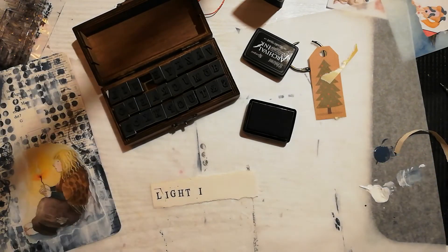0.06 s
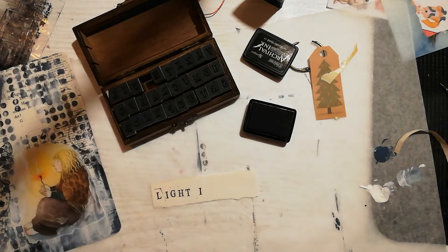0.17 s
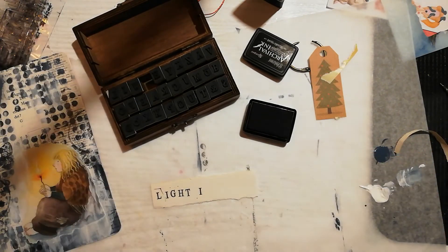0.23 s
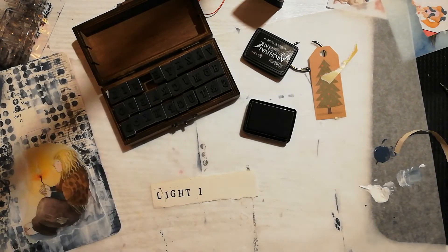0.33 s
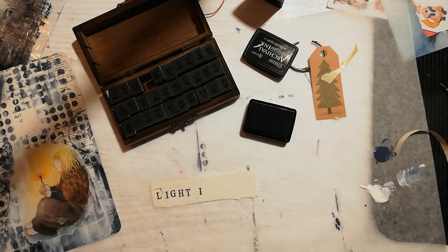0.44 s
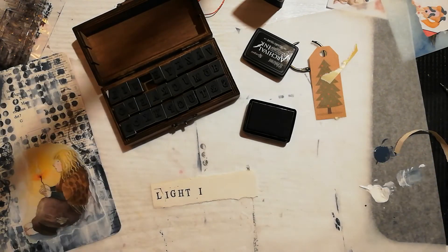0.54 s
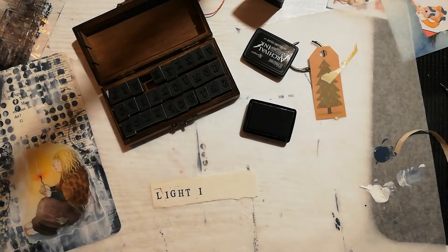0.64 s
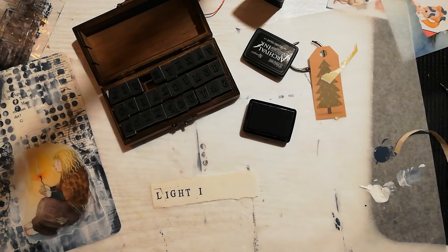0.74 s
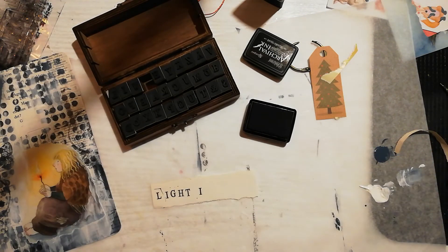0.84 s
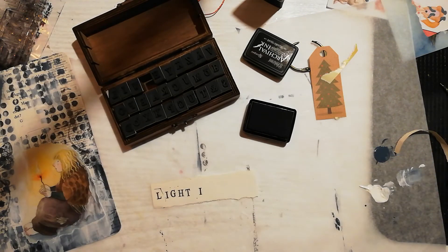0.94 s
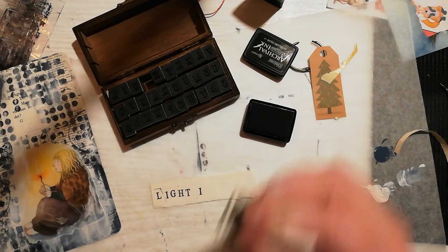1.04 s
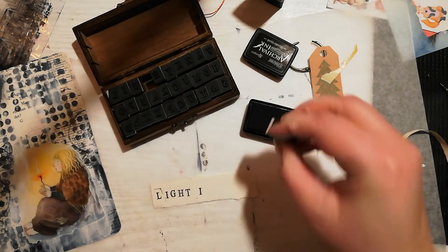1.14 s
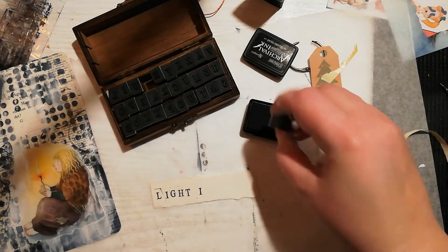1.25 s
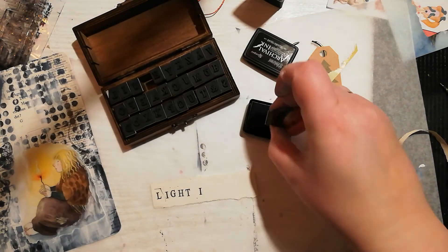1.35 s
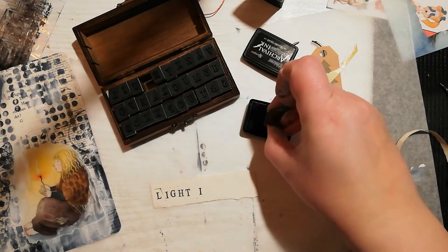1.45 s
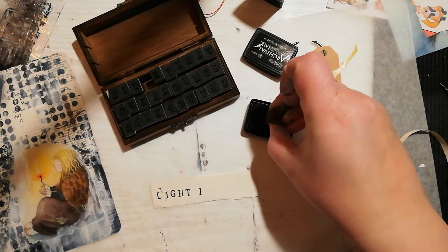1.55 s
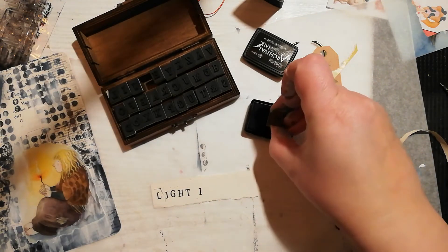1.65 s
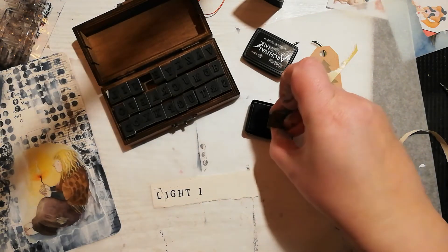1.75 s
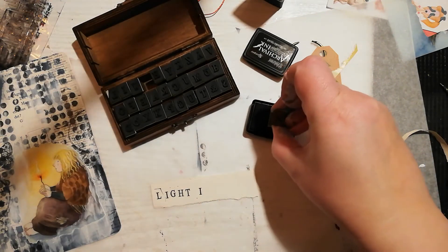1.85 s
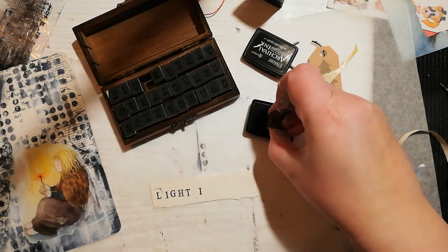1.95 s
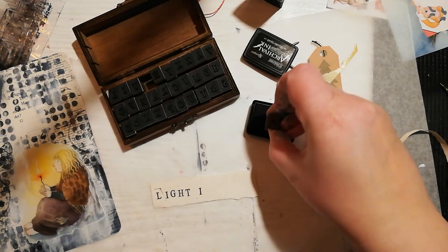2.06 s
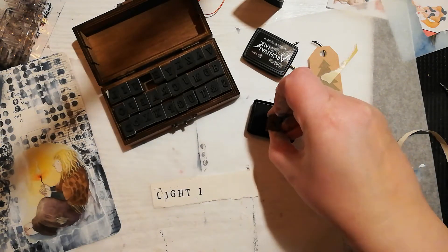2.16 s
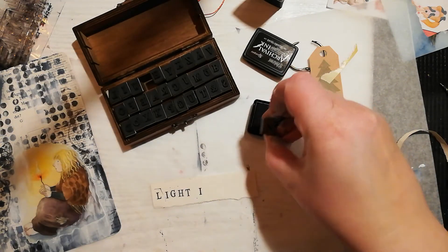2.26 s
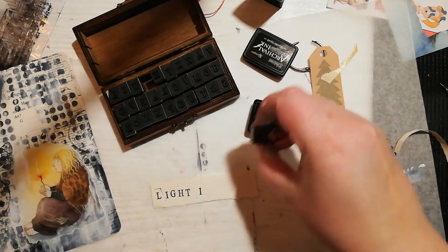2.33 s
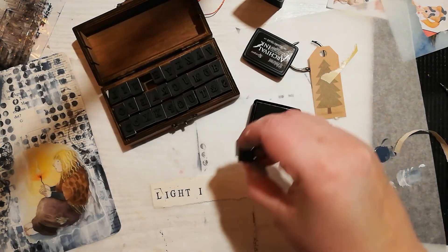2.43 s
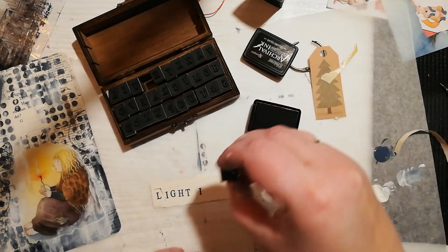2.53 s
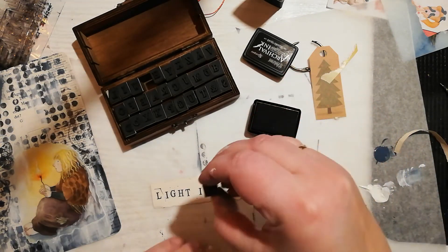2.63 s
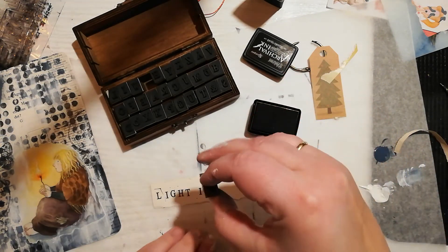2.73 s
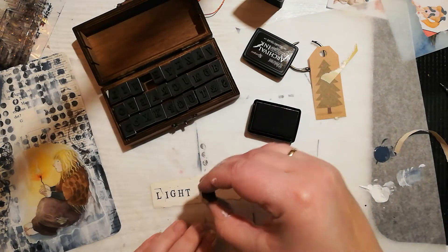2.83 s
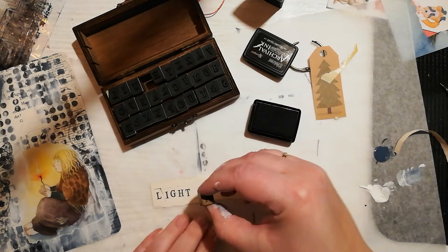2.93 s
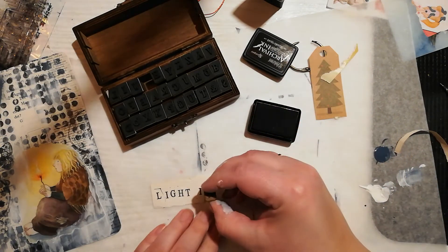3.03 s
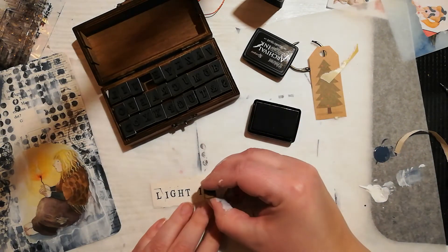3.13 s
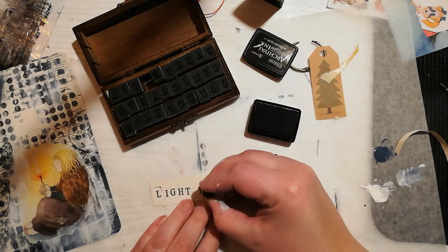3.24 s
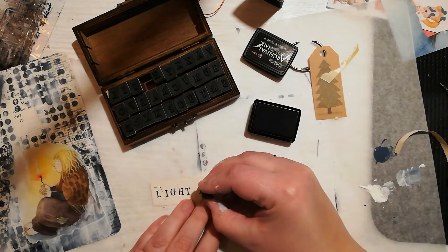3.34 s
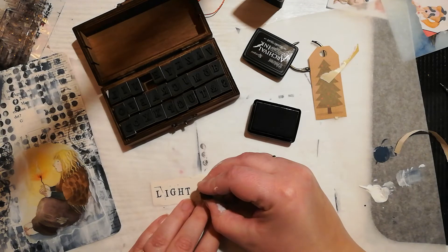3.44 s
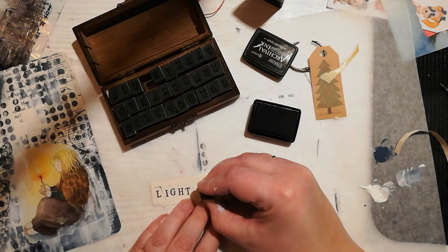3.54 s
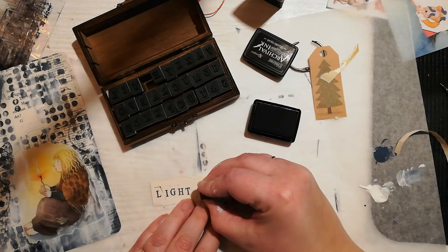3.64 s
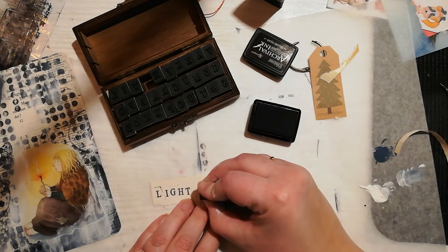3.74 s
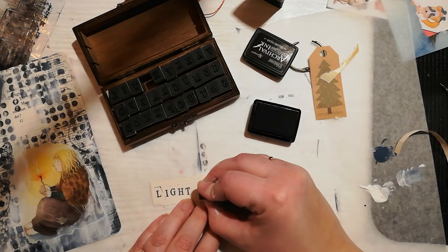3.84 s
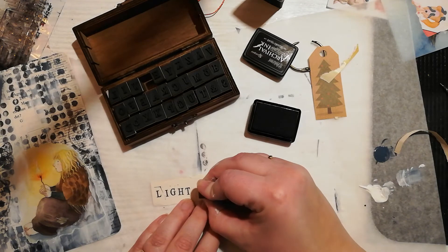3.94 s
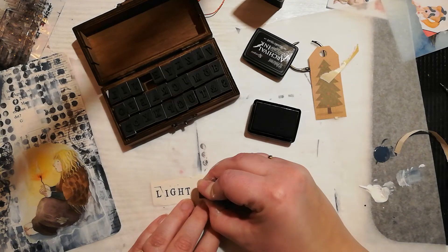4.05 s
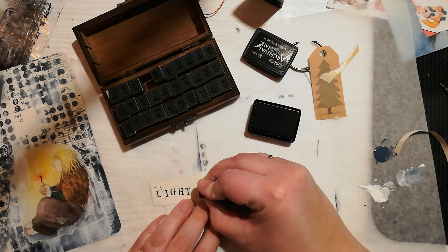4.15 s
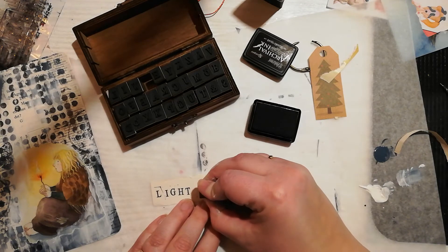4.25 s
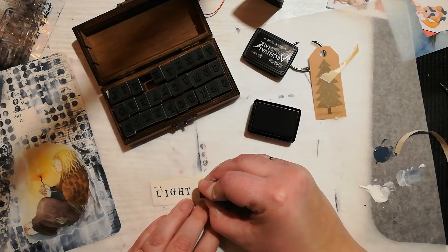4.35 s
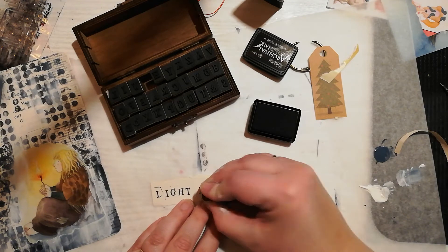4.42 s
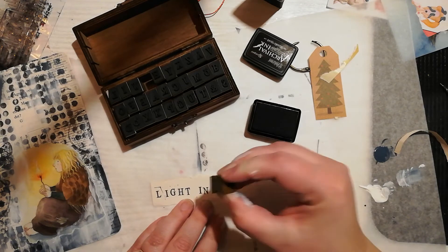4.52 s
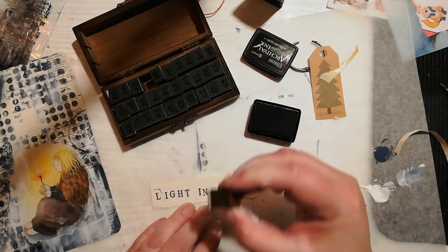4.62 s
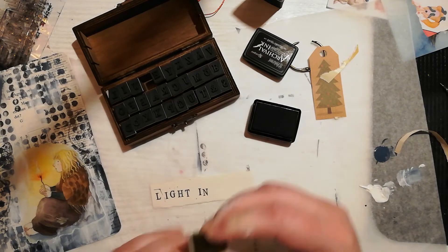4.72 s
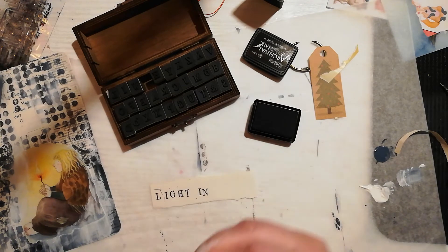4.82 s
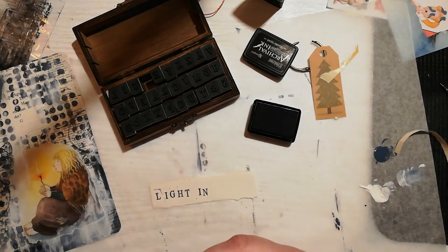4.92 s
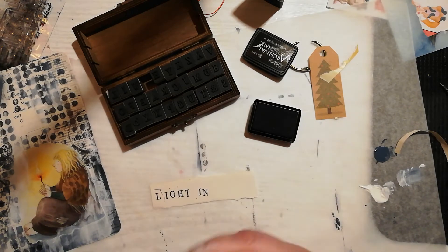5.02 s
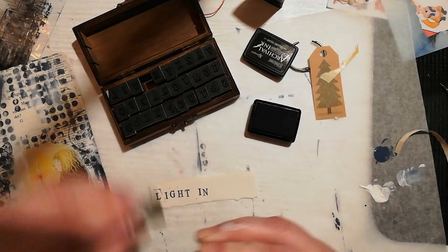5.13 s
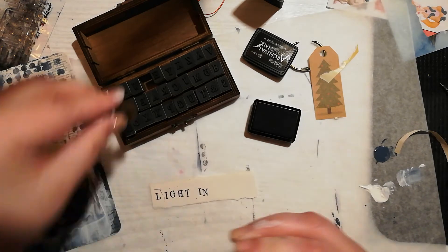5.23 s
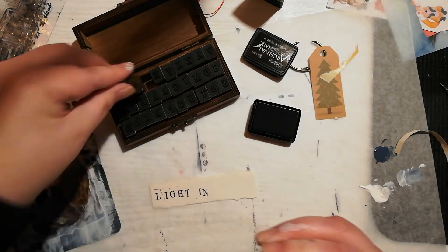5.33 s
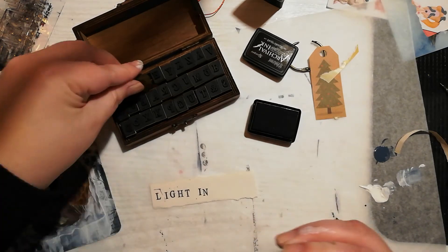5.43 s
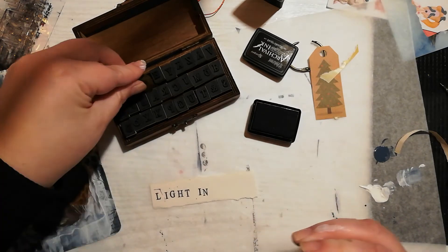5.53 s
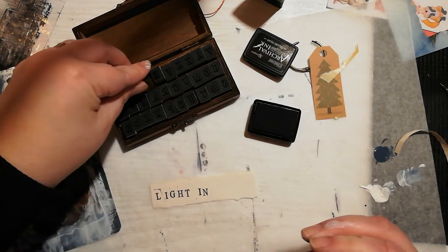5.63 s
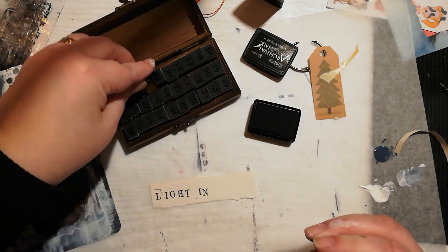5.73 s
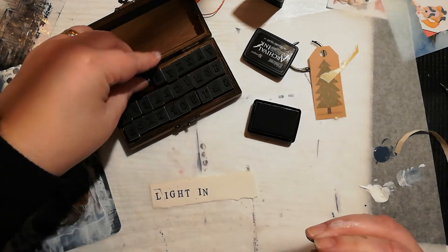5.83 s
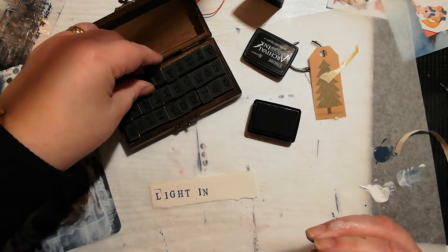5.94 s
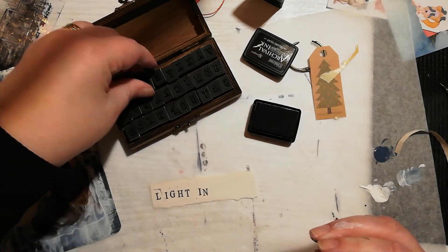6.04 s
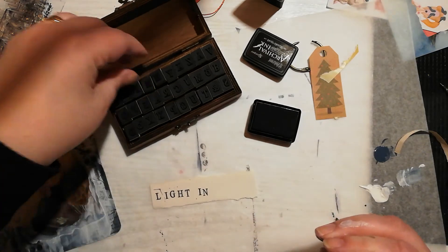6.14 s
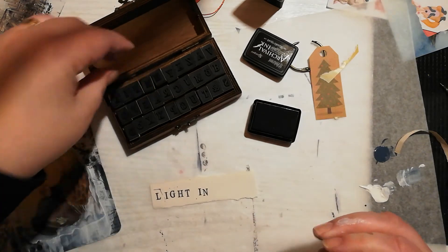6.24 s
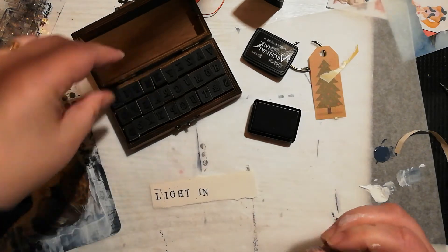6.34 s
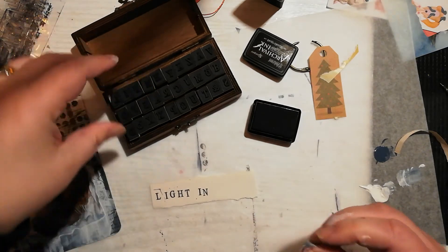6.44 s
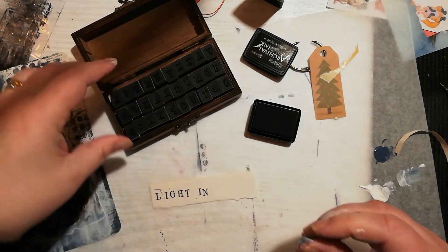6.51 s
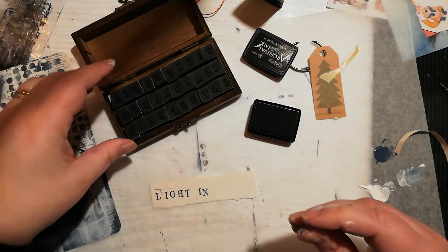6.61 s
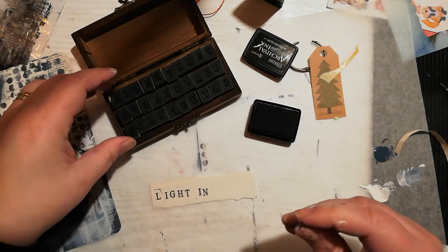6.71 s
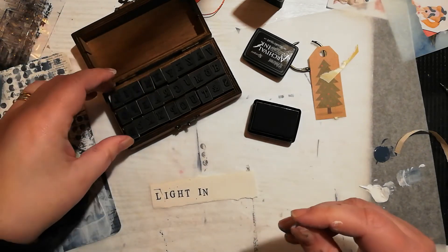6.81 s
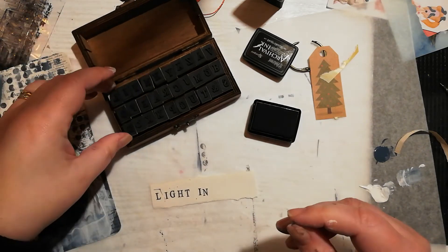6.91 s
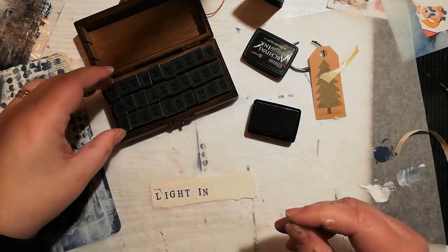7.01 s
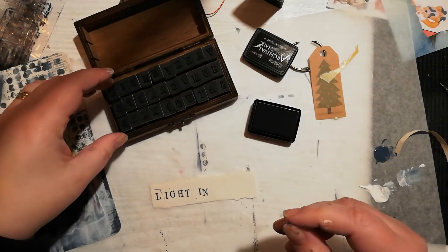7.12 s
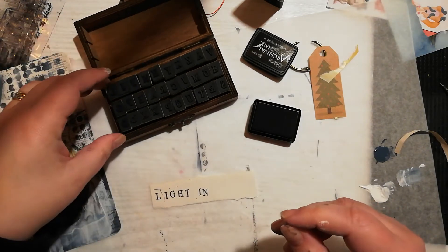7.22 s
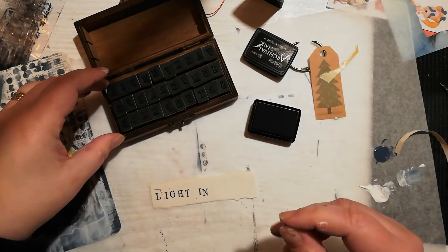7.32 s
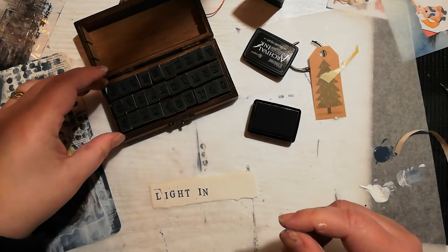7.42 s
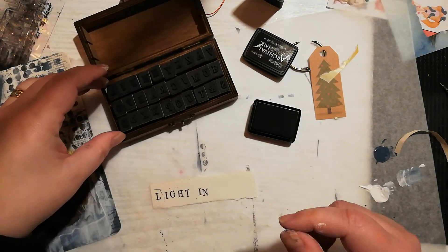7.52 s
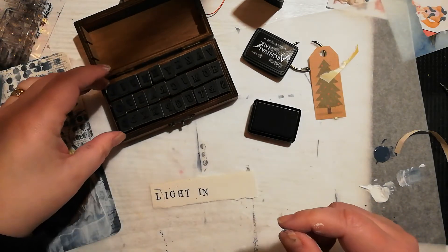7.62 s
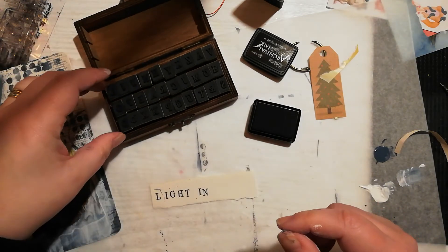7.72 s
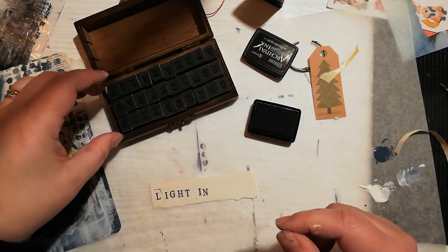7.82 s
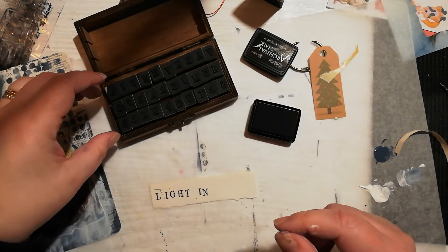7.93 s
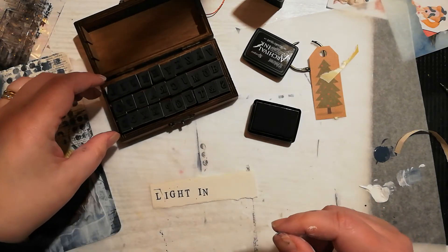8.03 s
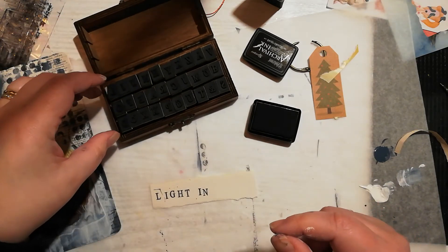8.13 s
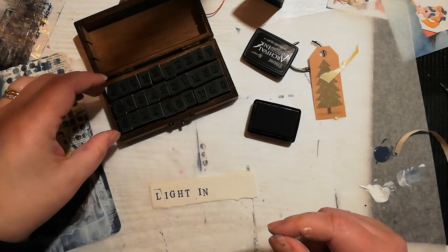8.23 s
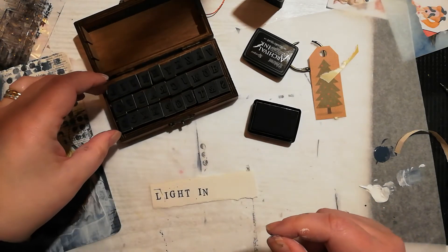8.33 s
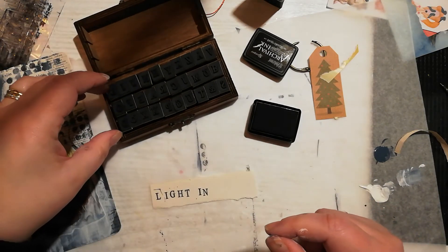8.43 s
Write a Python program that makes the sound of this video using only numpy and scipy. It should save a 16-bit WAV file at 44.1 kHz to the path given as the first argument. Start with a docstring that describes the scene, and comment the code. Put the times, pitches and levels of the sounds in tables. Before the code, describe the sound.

Close, small handling sounds come from a table in a quiet room, with a faint hiss, a low hum and a distant clock ticking softly once a second throughout. Near 0.8 seconds, fingers lightly brush paper. From 1.5 to 2.2 seconds, a wooden stamp is dabbed five times quickly on an ink pad, each dab a plastic knock with a low table thump. At 3 seconds the inked rubber meets paper with small, bright sticky snaps and crackles, which continue sparsely as it rocks, then cluster again as it peels off around 4.4 to 4.7 seconds. From 5.5 to 6.1 seconds the stamp clatters among other wooden stamps in their box, with short rattles and two sharp clacks near 5.9 and 6.05 seconds, the loudest sounds. A hand brushes past at 6.5 seconds and takes hold of the box around 7 with a soft scrape and click. Then only the room remains.

```python
"""A table in a small, quiet room. A wooden letter stamp is dabbed five times on an ink pad,
knocking the pad's plastic case and thumping the table. Its sticky rubber snaps and crackles as it
is set on a paper strip, rocked and peeled off. The stamp clatters back among the others in their
wooden box, and a hand takes hold of the box. Behind it all are a faint clock, a hiss and a low hum."""
import sys
import numpy as np
from scipy import signal
from scipy.fft import rfft, irfft, next_fast_len
from scipy.io import wavfile

SR = 44100
rng = np.random.default_rng(int(sys.argv[2]) if len(sys.argv) > 2 else 0)


def dump(signal):
    """Clip the signal to [-1, 1] and save it as 16-bit WAV at the path in sys.argv[1]."""
    limited = np.clip(np.atleast_2d(signal).T, -1, 1)
    pcm = np.round(limited * 32767).astype(np.int16)
    wavfile.write(sys.argv[1], SR, pcm)


N = 373394
RING_S = 0.3  # room left for each knock to die away

# The stamp hitting the ink pad: start_s, knock_db, thump_db, edge_db, tick_db, pitch_hz
# (the case follows pitch_hz only about halfway from the average)
DABS = [(1.471, -29.5, -34.5, -33.5, -37.5, 1206), (1.645, -25, -35.5, -29.5, -50, 1210),
        (1.811, -28, -32, -36, -47.5, 1490), (1.976, -24, -32, -27.5, -46, 1160),
        (2.144, -26, -29, -19.5, -39, 1050)]
# Fingers and stamp sliding on paper: start_s, rise_s, hold_s, hiss_db, crackle_db, dull_db
PAPER_RUBS = [(0.803, .1, 0.062, -64, -65, -68.5), (0.997, 0.08, 0.16, -70.5, -73, -76),
              (3.007, 0.025, 0.0074, -42, -43, -48.5), (3.059, 0.013, 0.021, -51, -46, -49),
              (3.173, 0.016, 0.16, -64, -63.5, -68), (3.862, 0.063, 0.046, -57.5, -59.5, -61.5),
              (4.419, 0.02, 0.17, -52.5, -54, -62.5), (4.629, 0.022, 0.087, -68, -63.5, -68)]
# Noise colours, or how strong a noise is from low to high: pitch_hz, level_db
TICK_COLOUR = [(1500, -35), (3500, -15.5), (5000, -11), (6000, -7.5), (7500, 6), (9200, 6.5), (11000, -6.5),
               (15500, -25)]  # two things first touching
CLATTER_COLOUR = [(300, -28), (850, -16.5), (1200, -5), (1800, -2), (3000, 1.5), (4000, -2.5), (5000, -5),
                  (6000, -12.5), (10000, -37)]  # struck wood
SNAP_COLOUR = [(2500, -35), (5000, -10), (7000, -1.5), (9300, 3.5), (11000, -6.5), (15500, -24)]  # something sticky letting go
CRACKLE_COLOUR = [(800, -5.5), (1800, -11.5), (3000, 2.5), (4500, 6), (6200, 3), (8000, -2.5), (12000, -28)]  # the crisp sound of paper
DULL_PAPER_COLOUR = [(60, -20), (250, -5.5), (500, -1), (750, 4), (1200, -1.5), (2000, -1.5), (4000, -16),
                     (9000, -43)]  # the soft, low sound of paper
# How alike left and right sound (1 is the same): pitch_hz, likeness
NEAR_LIKENESS = [(150, 1), (500, 0.29), (1200, .8), (3000, 0.12), (6000, 0.15), (12000, 0.083)]  # things on the table
FAR_LIKENESS = [(100, 0.98), (200, 0.6), (400, 0), (1000, 0), (3000, 0.02), (10000, 0)]  # sound from around the room


def ink_pad():
    """Each dab rings the pad's case and the stamp's handle; rubber ticks as it lands, ink fizzes after."""
    # The notes of the plastic case and of the wooden handle: pitch_hz, level_db, fade_s
    case_notes = [(470, -12, 0.034), (602, -19, 0.049), (730, -6.5, 0.023), (1102, -3.5, 0.031),
                  (1203, -3.5, 0.043), (1291, 3, 0.023), (1452, -12.5, 0.067), (1900, -5.5, 0.022)]
    handle_notes = [(2490, -1, 0.011), (2640, -12, 0.018), (3270, -1, 0.014), (3587, -6, 0.02),
                    (4190, -1, 0.008)]
    # Wet ink parting as the stamp lifts: start_s, level_db, length_s
    peels = [(1.542, -64.5, .018), (1.703, -59, 0.017), (1.866, -64.5, 0.034), (2.047, -68, .02),
             (2.202, -65, 0.026)]
    knocks, rubber = np.zeros((2, 2, N))
    average_hz = np.mean([dab[-1] for dab in DABS])
    for start_s, knock_db, _, edge_db, tick_db, pitch_hz in DABS:
        tune = (pitch_hz / average_hz) ** .5
        case = ring(case_notes, rise_s=0.00043, tune=tune, spread=.65, scatter=0.019)
        handle = ring(handle_notes, rise_s=0.00082, spread=.65, scatter=0.031)
        crack = amp(-13.5) * burst(CLATTER_COLOUR, fade_s=0.019, rise_s=0.00079)
        tick = burst(TICK_COLOUR, fade_s=0.011, rise_s=0.00069)
        add(knocks, start_s + 0.00066, amp(knock_db) * case + amp(edge_db) * (handle + crack), pan_db=.5)
        add(rubber, start_s, amp(tick_db) * tick, pan_db=-7.5)
    for start_s, level_db, length_s in peels:
        size = int(length_s * SR)
        ink_threads = unit(amp(3.3 * waver(1220, SR)[:size])) * signal.windows.tukey(size, .6)
        fizz = ink_threads * noise(SNAP_COLOUR, NEAR_LIKENESS, SR)[:, :size]
        add(rubber, start_s, amp(level_db) * fizz, pan_db=-8)
    return room(knocks, wet_db=-7, early_db=-6, echo_s=0.0099) + room(rubber, wet_db=-13, early_db=-12)


def table_top():
    """The table booms under each dab and nudge; a nudge also sounds the hollow of the box."""
    # The low notes of the table and of the hollow box: pitch_hz, level_db, fade_s
    table_notes = [(45, -3, 0.21), (58, -11.5, .11), (102.2, -1.5, 0.23), (116, 3, 0.2), (150, -8, 0.29),
                   (179, -5.5, 0.2), (199, -11.5, 0.28), (300, -21, 0.08)]
    hollow_notes = [(185, -0.5, .13), (201, -1, 0.11), (286, -4, 0.083), (482.5, -6, 0.058)]
    # Hands and box nudging the table: start_s, table_db, hollow_db, push_s
    nudges = [(3.06, -59, -68, .004), (4.441, -52, -72, .025), (4.53, -54, -75, .025),
              (5.46, -43.5, -78, .004), (5.493, -47, -62, 0.0026), (5.586, -51.5, -56, 0.0029),
              (5.631, -46.5, -60, 0.0031), (6.051, -53.5, -53.5, 0.0023), (7.044, -60, -51, .004)]
    out = np.zeros((2, N))
    for start_s, _, thump_db, *_ in DABS:
        thump = ring(table_notes, rise_s=0.0021, spread=0.11, scatter=0.052)
        add(out, start_s - .0015, amp(thump_db) * thump)
    for start_s, table_db, hollow_db, push_s in nudges:
        add(out, start_s, amp(table_db) * ring(table_notes, push_s, spread=0.071, scatter=0.045))
        add(out, start_s, amp(hollow_db) * ring(hollow_notes, push_s, spread=0.18, scatter=0.043))
    return out


def stamp_box():
    """Wooden stamps knock together in the box; some rock to rest in four ever weaker bounces."""
    # Wood hitting wood: start_s, box_db, block_db, tick_db, pitch_hz, pan_db
    clacks = [(5.463, -32.5, -31.5, -50, 2600, 1), (5.4847, -37, -53, -63, 2420, -3),
              (5.491, -35.5, -42, -49, 3000, -3), (5.5035, -30.5, -43, -57, 2930, 1),
              (5.5895, -38, -29.5, -46, 2950, 3), (5.6442, -41, -45.5, -61, 3280, 0),
              (5.6313, -42, -37.5, -37, 4240, 0.5), (5.6668, -39.5, -34.5, -63, 2890, 2),
              (5.8651, -15.5, -12.5, -31, 2650, 0), (6.0025, -41.5, -27, -60, 2710, 2),
              (6.0338, -37, -37.5, -57, 2460, -6), (6.0385, -32, -31, -62.5, 2500, 0),
              (6.0499, -20, -9.5, -34.5, 3480, -2), (6.057, -35, -21.5, -57, 2920, 6.5),
              (6.9207, -67, -41, -70, 2230, 2)]
    # A loose stamp rocking: start_s, first_db, gap_s, pitch_hz
    rattles = [(5.4952, -30.5, .0078, 2600), (5.6106, -43, 0.0084, 2820), (5.873, -31, .009, 2600),
               (5.98, -43, .0085, 3570), (6.0724, -26, 0.01, 2620)]
    out = np.zeros((2, N))
    for start_s, *blow, pan_db in clacks:
        add(out, start_s, clack(*blow), pan_db)
    for start_s, first_db, gap_s, pitch_hz in rattles:
        for k in range(4):
            level_db = first_db - 4 * k
            bounce_hz = pitch_hz * (1 + .08 * rng.uniform(-1.2, 1))
            bounce = clack(box_db=level_db - 2.5, block_db=level_db, tick_db=level_db - 28, hz=bounce_hz)
            add(out, start_s + k * gap_s, bounce, pan_db=3)
    thinned = cut_lows(cut_lows(out, hz=1090), hz=960)  # small things give off little low sound
    return room(thinned, wet_db=-13, early_db=-18.5)


def clack(box_db, block_db, tick_db, hz):
    """One wooden block strikes another: it rings briefly at its own pitch and shakes the box."""
    # The notes of the box and of the block: pitch_hz, level_db, fade_s
    box_notes = [(1220, -15, .018), (1530, -6, .018), (1796, 5.5, 0.023), (2400, -7, .022),
                 (5170, -10.5, 0.011)]
    block_notes = [(hz * 0.876, -8, .006), (hz, 0, .01), (hz * 1.124, -7, .007), (hz * 1.7, -15, .005)]
    # Hard blows ring the box at a nearly steady pitch; light ones vary more in pitch.
    scatter = .015 if box_db > -25 else .11
    box = ring(box_notes, rise_s=0.00037, spread=.2, scatter=scatter)
    block = ring(block_notes, rise_s=0.00043, spread=.2)
    crack = amp(-16.5) * burst(CLATTER_COLOUR, fade_s=0.045, rise_s=.0004)
    tick = burst(TICK_COLOUR, fade_s=0.016, rise_s=0.00027)
    return amp(box_db) * box + amp(block_db) * (block + crack) + amp(tick_db) * tick


def sticky_rubber(strays_per_s=35):
    """Inked rubber bumps onto the paper, grips and lets go in snaps; sliding adds small stray ones."""
    # Sticky rubber or a fingertip letting go: start_s, level_db, pan_db
    snaps = [(1.705, -46.5, -2), (3.036, -34, -10), (3.0838, -32, -4), (3.1062, -34.5, 1),
             (3.1996, -44, -6), (3.2279, -37, 1), (3.2598, -38.5, 0), (3.3373, -43.5, -3),
             (3.6653, -44.5, -4), (3.7668, -46, -3), (3.7982, -42.5, -5), (4.4513, -40, -14),
             (4.4607, -32.5, -4), (4.492, -41, -12), (4.626, -33.5, -2), (4.7183, -48, -5),
             (5.495, -43, -10), (5.5822, -43.5, -3), (7.0531, -37, -1)]
    # Stamp or finger landing on the paper: start_s, crackle_db, dull_db
    bumps = [(0.8079, -61, -57), (3.0176, -47, -66), (3.0632, -32, -47), (3.0735, -38, -42),
             (3.2006, -42.5, -52), (3.3379, -57, -56), (3.9416, -37.5, -55), (4.4354, -55, -51.5),
             (4.5744, -41, -55), (4.6019, -37.5, -49.5), (4.677, -47, -70)]
    out = np.zeros((2, N))
    strays = []
    for start_s, rise_s, hold_s, hiss_db, *_ in PAPER_RUBS:
        count = round(strays_per_s * hold_s)
        for when, strength, side in rng.uniform(-1.3, 1, (40, 3))[:count]:
            stray_s = start_s + rise_s + hold_s * (when + 1) / 2
            strays.append((stray_s, hiss_db + 2 + 4 * strength, 6 * side - 3))
    for start_s, level_db, pan_db in snaps + strays:
        add(out, start_s, paper_touch(level_db, crackle_db=level_db - 11.5, dull_db=level_db - 20), pan_db)
    for start_s, crackle_db, dull_db in bumps:
        add(out, start_s, paper_touch(crackle_db - 3.5, crackle_db, dull_db), pan_db=3)
    return room(out, wet_db=-11.5, early_db=-12.5)


def paper_touch(snap_db, crackle_db, dull_db):
    """A bright snap, which the paper answers with a crackle and a dull tap."""
    return (amp(snap_db) * burst(SNAP_COLOUR, fade_s=0.014, rise_s=0.00037)
            + amp(crackle_db) * burst(CRACKLE_COLOUR, fade_s=0.026, rise_s=0.00015)
            + amp(dull_db) * burst(DULL_PAPER_COLOUR, fade_s=0.037, rise_s=0.00021))


def hands():
    """Hands and stamp rub over the paper, a little to the right, and over the box, in the middle."""
    # The stamp sliding home, then a hand on the box: start_s, rise_s, hold_s, hiss_db, wood_db, drag_db
    box_rubs = [(5.46, .025, 0.022, -63, -53, -65.5), (5.58, 0.011, 0.045, -62, -54.5, -67),
                (5.72, 0.061, 0.012, -58.5, -58, -60), (5.815, 0.027, 0.011, -53, -46, -62),
                (6.84, 0.072, 0.033, -72, -64, -70.5), (6.95, 0.049, .025, -63, -63, -57),
                (6.985, .055, .012, -52.5, -54, -66)]
    # The hand brushing past the box: start_s, rise_s, hold_s, level_db
    skin_strokes = [(6.53, .06, .05, -61)]
    # The noise of the box dragging on the table, and of dry skin: pitch_hz, level_db
    drag_colour = [(80, -11.5), (190, -2), (310, -9), (380, 0), (450, 6), (520, 4), (620, -15), (1000, -5),
                   (2000, -32), (6000, -43.5)]
    skin_colour = [(5000, -36), (7500, -5), (9500, 1), (11500, -5), (15500, -14)]
    paper_colours = [SNAP_COLOUR, CRACKLE_COLOUR, DULL_PAPER_COLOUR]
    box_colours = [SNAP_COLOUR, CLATTER_COLOUR, drag_colour]
    paper = rubbing(PAPER_RUBS, paper_colours, fade_s=0.28, rough_db=4, catches_per_s=600)
    box = rubbing(box_rubs, box_colours, fade_s=0.16, rough_db=4, catches_per_s=310)
    skin = rubbing(skin_strokes, [skin_colour], fade_s=0.35, rough_db=3, catches_per_s=900)
    return room(paper * amp([[-3.5], [0]]) + box + skin, wet_db=-19, early_db=-10.5)


def rubbing(strokes, colours, fade_s, rough_db, catches_per_s):
    """Each stroke swells, holds and dies away; the surfaces catch unevenly, making it rough."""
    out = np.zeros((2, N))
    t = np.arange(SR) / SR
    for start_s, rise_s, hold_s, *levels in strokes:
        swell = np.minimum(t / rise_s, 1) ** 2
        fade = amp(-60 * np.maximum(t - rise_s - hold_s, 0) / fade_s)
        catches = unit(amp(rough_db * waver(catches_per_s, SR)))
        hiss = sum(amp(db) * noise(colour, NEAR_LIKENESS, SR) for db, colour in zip(levels, colours))
        add(out, start_s, swell * fade * catches * hiss)
    return out


def clock(first_s=0.859, width_s=0.034, level_db=-59.5):
    """A far clock steps once a second, blurred by the room into a soft puff of noise."""
    # The thin sound of the clock's tick: pitch_hz, level_db
    clock_colour = [(1500, -21), (3000, -11), (3900, -5), (4700, -7.5), (5600, -17), (7800, -7),
                    (9500, -13.5), (12000, -25)]
    from_tick_s = (np.arange(N) / SR - first_s + .5) % 1 - .5
    pulses = np.exp(-(from_tick_s / width_s) ** 2)
    return amp(level_db) * pulses * noise(clock_colour, FAR_LIKENESS, next_fast_len(N))[:, :N]


def room_tone(air_db=-61.5, fall_db_per_s=0.2039, hum_hz=103, hum_db=-76):
    """Rumble and hiss that slowly get quieter, and a low hum that wavers in level and pitch."""
    # The rumble and hiss of the room: pitch_hz, level_db
    air_colour = [(20, 0), (42, -5.5), (60, -10), (100, -5.5), (135, -15), (280, -13.5), (480, -21.5),
                  (1200, -18.5), (1900, -20), (4000, -22.5), (7000, -24.5), (9400, -22.5), (11200, -30),
                  (15800, -33.5)]
    t = np.arange(N) / SR
    air = amp(air_db - fall_db_per_s * t) * noise(air_colour, FAR_LIKENESS, next_fast_len(N))[:, :N]
    hum_gain = amp(hum_db + 4.4 * waver(8.3, N)) * np.sqrt(2)
    pitch_hz = hum_hz + 3 * waver(11, N)
    return air + hum_gain * np.sin(2 * np.pi * np.cumsum(pitch_hz) / SR)


def room(sound, wet_db, early_db, echo_s=0.0074):
    """Adds quick echoes off nearby things (early_db) and a short tail (wet_db); both keep shifting."""
    # How long the room rings: pitch_hz, fade_s
    room_fades = [(100, 0.23), (500, 0.28), (1200, 0.24), (3000, 0.21), (6000, 0.17), (12000, 0.23)]
    size = SR // 2
    t = np.arange(size) / SR
    out = sound.copy()
    for k in range(3):  # three sets of echoes take turns, as when hands move about
        white = noise([(20, 0), (20000, 0)], FAR_LIKENESS, size)
        hz, times, bands = signal.stft(white, SR, nperseg=256)
        fade = amp(-60 * times / value_at(room_fades, hz)[:, None])
        tail = signal.istft(bands * fade, SR, nperseg=256)[1][:, :size]
        tail *= np.clip((t - .004) / .006, 0, 1)
        early = np.roll(tail, -SR // 50, axis=1) * np.exp(-((t - echo_s) / .003) ** 2)
        echoes = amp(wet_db) * unit(tail) + amp(early_db) * unit(early)
        share = np.sqrt(2 / 3) * np.cos(2 * np.pi * (3.1 * np.arange(N) / SR + k / 3))
        out += signal.fftconvolve(sound * share, echoes / np.sqrt(size), axes=1)[:, :N]
    return out


def ring(notes, rise_s, tune=1, spread=0, scatter=0):
    """A struck thing rings with several notes, each falling 60 dB in its fade_s."""
    t = np.arange(int(RING_S * SR)) / SR
    out = 0
    for k, (hz, level_db, fade_s) in enumerate(notes):
        shift = spread * (-1) ** k * np.array([[1], [-1]])  # puts left and right out of step, in radians
        pitch_hz = hz * tune * (1 + scatter * rng.uniform(-1.3, 1))  # a little different at each blow
        out = out - amp(level_db - 60 * t / fade_s) * np.sin(2 * np.pi * pitch_hz * t + shift)
    out = out * (1 - np.exp(-(t / rise_s) ** 2))
    return out / abs(out).max()


def burst(colour, fade_s, rise_s):
    """Countless close notes dying together make a short crack of noise."""
    t = np.arange(int(RING_S * SR)) / SR
    shape = amp(-60 * t / fade_s) * (1 - np.exp(-(t / rise_s) ** 2))
    return noise(colour, NEAR_LIKENESS, len(t)) * shape / shape.max()


def noise(colour, likeness, size):
    """Noise of a given colour, partly alike on the left and right."""
    hz = np.fft.rfftfreq(size, 1 / SR)
    left, other = rfft(rng.standard_normal((2, size)))
    alike = np.clip(value_at(likeness, hz), -1, 1)
    right = alike * left + np.sqrt(1 - alike ** 2) * other
    return unit(irfft(np.array([left, right]) * amp(value_at(colour, hz)), size))


def waver(per_s, size):
    """A random wobble that glides through per_s new values a second."""
    steps = np.arange(size) * per_s / SR
    return np.interp(steps, np.arange(size), rng.standard_normal(size))


def cut_lows(sound, hz):
    """Turns down everything below hz."""
    return signal.sosfilt(signal.butter(4, hz, "highpass", fs=SR, output="sos"), sound)


def add(mix, start_s, sound, pan_db=0):
    """Mixes a sound in at start_s; a pan_db above zero moves it left."""
    part = mix[:, round(start_s * SR):][:, :sound.shape[-1]]
    part += (sound * amp([[pan_db / 2], [-pan_db / 2]]))[:, :part.shape[1]]


def value_at(table, hz):
    """Looks up a table at any pitch, gliding between its rows."""
    pitches, values = np.transpose(table)
    return np.interp(np.log(hz + 1), np.log(pitches + 1), values)


def amp(db):
    """Turns decibels into a number to multiply by."""
    return 10 ** (np.asarray(db) / 20)


def unit(sound):
    """Scales a sound to an average strength (rms) of 1."""
    return sound / np.sqrt(np.mean(sound ** 2) + 1e-20)


def scene():
    """Everything on and around the table."""
    return ink_pad() + table_top() + stamp_box() + sticky_rubber() + hands() + clock() + room_tone()


def record(dry, top_hz=15900):
    """Cuts off the very highest sounds."""
    low_pass = signal.firwin(511, top_hz, window=("kaiser", 9), fs=SR)
    return signal.oaconvolve(dry, low_pass[None], "same")


dry = scene()
out = record(dry)
dump(out)
```